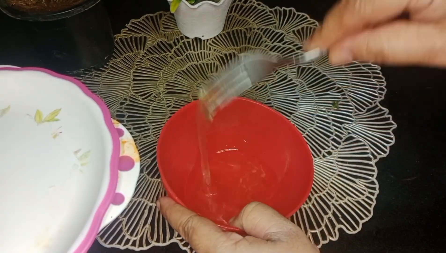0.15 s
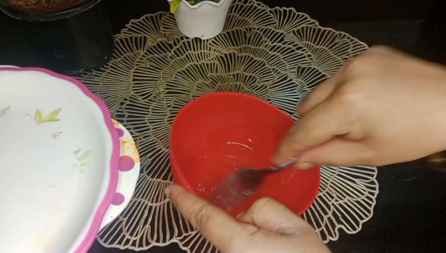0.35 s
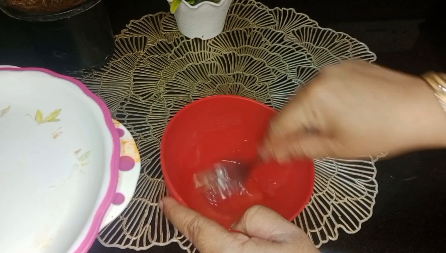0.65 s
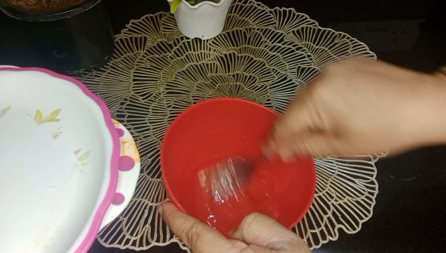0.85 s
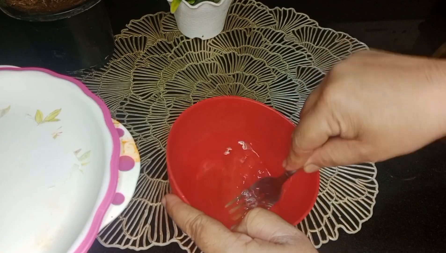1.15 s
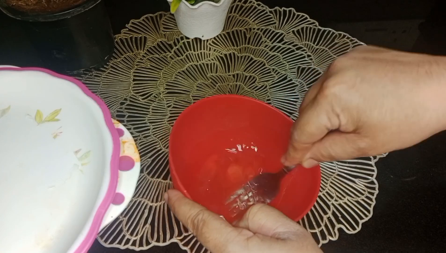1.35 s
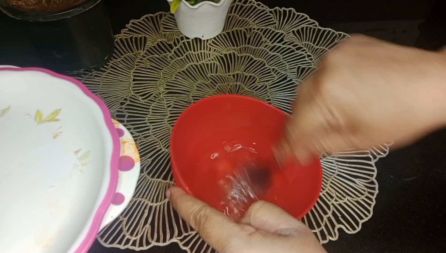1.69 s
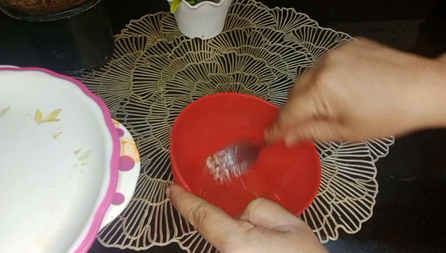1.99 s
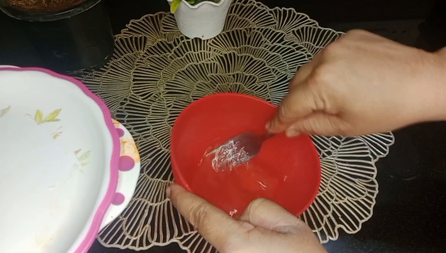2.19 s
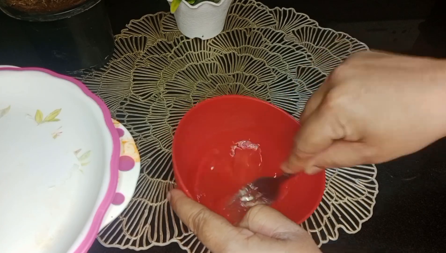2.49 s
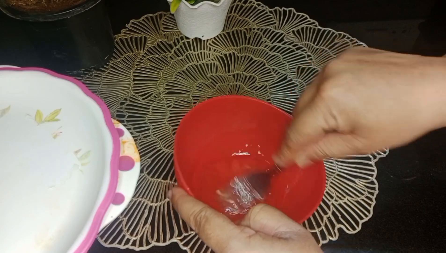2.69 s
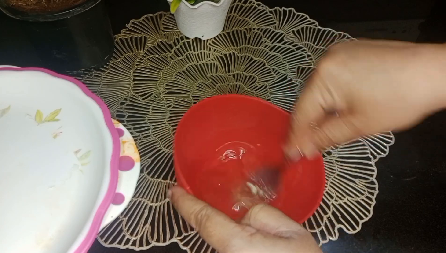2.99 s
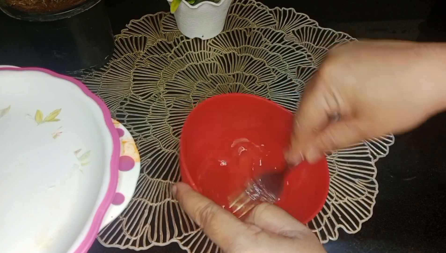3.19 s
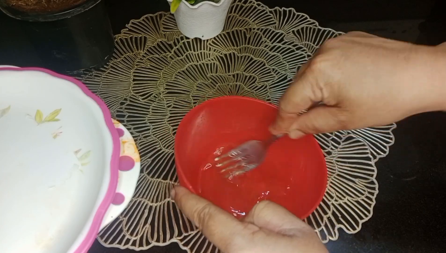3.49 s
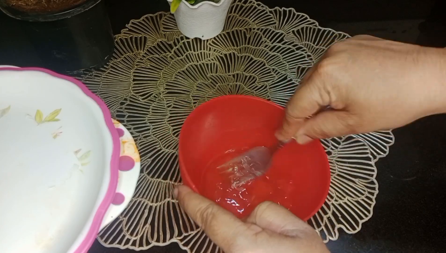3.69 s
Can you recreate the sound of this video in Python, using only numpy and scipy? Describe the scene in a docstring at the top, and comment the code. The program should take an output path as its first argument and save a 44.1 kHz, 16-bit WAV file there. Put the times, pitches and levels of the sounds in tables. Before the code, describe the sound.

A metal fork beats egg whites in a small plastic bowl. Only faint air and hand rumble until 0.5 s, then quick irregular clacks, dry and hollow, mix with short scratchy scrapes, bubbling, fizz and tiny wet snaps. From about 1.9 s the strokes grow denser and stronger; low table bumps come occasionally, the clearest at 2.0 s. Beating thins slightly after 3.4 s. Close, nearly mono, small kitchen.

```python
"""In a kitchen, a steel fork beats egg whites quickly in a small hand-held plastic bowl.
Tines clack and chatter: bursts of force through resonances of the base, wall and upper bowl.
Scrapes are stick-slip grains, the egg is chirping bubbles, fizz, sinking gulps and noise snaps,
and low thuds are the bowl bumping the table. Faint handling, air and a small room surround it;
the sound is close and nearly mono."""
import sys
import numpy as np
from scipy import signal
from scipy.fft import rfft, irfft, next_fast_len
from scipy.io import wavfile
from scipy.ndimage import uniform_filter1d, map_coordinates

SR = 44100
rng = np.random.default_rng(int(sys.argv[2]) if len(sys.argv) > 2 else 0)


def pcm_store(signal):
    """Save signal as 16-bit PCM."""
    levels = np.round(np.clip(np.atleast_2d(signal), -1, 1) * 32767)
    wavfile.write(sys.argv[1], SR, levels.astype(np.int16).T)


N = 169785  # length in samples


def amp(db):
    """Decibels to gain."""
    return 10 ** (np.asarray(db) / 20)


def unit(x):
    """Scale to rms 1."""
    return x / np.sqrt(np.mean(x ** 2) + 1e-20)


def along(points, hz):
    """Read (frequency, value) points on a log frequency axis."""
    f, v = np.transpose(points)
    return np.interp(np.log(hz + 1), np.log(f + 1), v)


def filtered(x, response):
    """Multiply the spectrum of x by a response of frequency."""
    n = x.shape[-1]
    m = next_fast_len(2 * n)
    return irfft(rfft(x, m) * response(np.fft.rfftfreq(m, 1 / SR)), m)[..., :n]


def coloured(x, spectrum):
    """Shape x with (frequency_hz, level_db) points, at rms 1."""
    return unit(filtered(x, lambda f: amp(along(spectrum, f))))


def resonate(x, modes, order=1):
    """Ring x through parallel (pitch_hz, width_hz, level_db) modes; a higher order steepens the skirts."""
    def response(f):
        total = 0
        for pitch, width, db in modes:
            band = 1j * f * width / (pitch * pitch - f * f + 1j * f * width)
            total = total + amp(db) * band ** order
        return total
    return filtered(x, response)


def burst(x):
    """Scale a short sound to the energy of 10 ms at rms 1."""
    return x * np.sqrt(SR / 100 / np.sum(x ** 2))


def add(track, s, x):
    """Mix x into track at time s in seconds."""
    part = track[max(round(s * SR), 0):][:len(x)]
    part += x[:len(part)]


def wobble(rate):
    """A smooth random curve with the given number of knots a second."""
    return map_coordinates(rng.standard_normal(int(N * rate / SR) + 4), [np.arange(N) * rate / SR])


def grains(rate, spread_db):
    """Random tiny impulses of either sign and uneven size, rate a second."""
    hits = rng.random(N) < rate / SR
    sizes = amp(spread_db * np.clip(rng.standard_normal(N), -2, 2))
    return hits * rng.choice([-1, 1], N) * sizes


# spectrum of the still air, before it is set to its rms: frequency_hz [Hz], level_db [dB]
AIR_SPECTRUM = [(20, -18.5), (110, 4), (700, -5), (2000, -20), (16000, -38.5)]
AIR_DB = -70


def air():
    """Steady noise, weighted to the lows."""
    return amp(AIR_DB) * coloured(rng.standard_normal(N), AIR_SPECTRUM)


def handling():
    """The bowl rumbles faintly in the hand: low noise of drifting level, from 0.38 s on."""
    held = np.arange(N) / SR > .38
    level = amp(-70.5 + 1.8 * wobble(14)) * held
    return level * unit(resonate(rng.standard_normal(N), [(111, 165, 0)], order=2))


# fader moves for the hollow base, before SWIRL_TRIM_DB: time_s [s], level_db [dB]
SWIRL_LEVELS = [(.49, -60), (.55, -47.5), (.70, -38.5), (.82, -67), (1.38, -66), (1.76, -51), (1.87, -29.5),
                (2.10, -32.5), (2.22, -46), (2.47, -37.5), (2.62, -54), (2.8, -59)]
SWIRL_TRIM_DB = -7.5


def swirl():
    """The swirled egg and dragging fork keep the base murmuring: grains through one broad resonance."""
    level_db = np.interp(np.arange(N) / SR, *np.transpose(SWIRL_LEVELS), left=-120)
    murmur = unit(resonate(grains(700, spread_db=3.5), [(1122, 355, 0)], order=3))
    return amp(level_db + SWIRL_TRIM_DB) * murmur


# tines meet the bowl; levels are before CONTACT_TRIM_DB and chatter is held to 1 ms or more:
# start_s [s], chatter_ms [ms], wall_pitch_hz [Hz], base_level_db [dB], wall_level_db [dB], upper_level_db [dB]
CONTACTS = [(0.491, 6, 1970, -77, -24.5, -37.0), (0.5348, 6.9, 1860, -71, -29.0, -51),
            (0.5424, 1.8, 1900, -42.5, -31, -32), (0.6642, 8.1, 2060, -38.5, -29.5, -33.5),
            (0.6747, 3.7, 1900, -32.5, -48, -29), (0.7614, 4.7, 2040, -46, -29, -34.5),
            (0.7866, 4.7, 2070, -55, -27, -35.5), (0.826, 16, 2210, -68, -23, -40),
            (0.8537, 3.1, 2260, -46, -21.5, -25), (0.8751, 4.1, 1760, -38.5, -35, -29.5),
            (0.987, 2.9, 1780, -57, -32.0, -35.5), (1.023, 4.5, 2060, -65, -32.5, -44),
            (1.0475, 2.9, 2290, -46, -30.5, -31.5), (1.0731, 6.8, 1960, -42.5, -36.5, -39.5),
            (1.1343, 4.1, 2130, -69, -34, -32.5), (1.158, 0.87, 2260, -50.5, -35.0, -27.0),
            (1.201, 7.8, 1970, -51, -22.5, -35), (1.2282, 2, 2165, -40.5, -19, -20.5),
            (1.251, 4.1, 1980, -38.0, -36, -34.5), (1.3126, 2.5, 2220, -67, -29.5, -38),
            (1.3533, 2.1, 2040, -68, -36, -32.5), (1.3949, 12.2, 1940, -34.5, -23, -41),
            (1.427, 3.7, 2170, -34.5, -30, -28.5), (1.4939, 4.2, 2110, -57, -35.5, -31),
            (1.5091, 15, 2170, -47, -42, -33), (1.5289, 2.7, 1970, -63, -20, -25),
            (1.5852, 4.6, 1910, -39, -22, -33.5), (1.598, 22, 2160, -35, -25, -50),
            (1.6154, 3.5, 1876, -29, -24.5, -27), (1.7873, 7.5, 2110, -32, -24, -25),
            (1.808, 2.1, 2050, -19, -29.0, -33.5), (1.9212, 2.7, 2030, -33.5, -24.5, -28.5),
            (1.9637, 2.7, 1990, -45, -21, -44), (1.99, 1.1, 2030, -35, -24.5, -23),
            (2.009, 3.2, 1880, -18.0, -39, -30.0), (2.0643, 5.7, 2030, -33.5, -30.5, -38),
            (2.1127, 2.2, 2000, -42, -28, -40), (2.1495, 4.3, 1760, -31, -20, -23.5),
            (2.1618, 5.6, 2220, -51, -19, -29.5), (2.1745, 7.5, 1660, -48, -24, -27.0),
            (2.2917, 1.9, 2020, -66, -29.5, -34), (2.3342, 3.6, 1900, -32, -19, -30),
            (2.3463, 7.3, 2186, -42, -17, -36), (2.3596, 5, 1950, -36, -24, -24.5),
            (2.3797, 1.5, 2010.0, -27.5, -50, -41), (2.4459, 7.7, 2230, -29.5, -24, -28.5),
            (2.4538, 4.2, 2090, -48, -24.5, -45), (2.527, 4.4, 2080, -33.5, -20.5, -26.5),
            (2.5407, 6.6, 1630, -53, -22.5, -26.0), (2.5548, 7.9, 1930, -34, -27.5, -22.0),
            (2.577, 2.3, 2060, -26.5, -35, -33.5), (2.6593, 4.3, 1780, -35.5, -23.5, -23),
            (2.7156, 5.8, 1920, -52, -26.5, -57), (2.726, 7.4, 2000, -48, -32, -40),
            (2.7426, 3.8, 2060, -37, -22, -21.5), (2.8771, 2.2, 1970, -56, -30.0, -34.5),
            (2.9065, 1.3, 2150, -43, -33, -23), (2.9358, 4.8, 2090, -43.5, -36.5, -38.5),
            (3.0083, 5.3, 2120, -34.0, -29.5, -43), (3.083, 2.9, 2140, -57, -19, -25.5),
            (3.105, 3.7, 2030, -43.5, -24.5, -45), (3.109, 2.3, 2060, -45, -46, -31.5),
            (3.167, 2.8, 2180, -47, -28.5, -35.0), (3.2726, 1, 2190, -47.0, -30.0, -23.5),
            (3.2981, 5.5, 1920, -34.0, -34, -28), (3.3792, 2.25, 1600, -33.5, -25.5, -23),
            (3.4706, 2.3, 2220, -57, -26, -32), (3.4949, 5.3, 2020, -48.5, -30, -43),
            (3.5881, 2.2, 1556, -38.5, -23.5, -25.5), (3.649, 5.6, 2080.0, -45.5, -37, -60),
            (3.6789, 4.5, 2170, -60, -17.5, -28.0), (3.7066, 4.6, 1930, -38, -33.0, -33.5),
            (3.7443, 2.9, 2004, -47.5, -25.5, -35.5)]
# base of the bowl, pitches before the sag: pitch_hz [Hz], width_hz [Hz, one filter pass], level_db [dB]
BASE_MODES = [(896.4, 90, -6), (1150, 386, 0)]
# upper resonances, before random scatter: pitch_hz [Hz], width_hz [Hz, one filter pass], level_db [dB]
UPPER_MODES = [(3040, 140, -2.5), (3476, 270, 3.5), (4214, 150, -7.5), (5376, 510, -11), (7440, 230, -80)]
WALL_WIDTH_HZ = 316  # one filter pass
CONTACT_TRIM_DB, CRACK_DB, MODE_SCATTER_DB = -1.5, -17.5, 3.5
CHATTER = 0.52  # noise gain beside the push
BASE_SAG_PER_DB = 0.02  # share of pitch lost per dB of harder push


def contacts():
    """A push and short chatter of the tines ring the damped plastic; a harder push sounds the base lower."""
    out, t = np.zeros(N), np.arange(2048) / SR
    usual_db = np.mean([row[3] for row in CONTACTS])
    for s, ms, wall_hz, base_db, wall_db, upper_db in CONTACTS:
        u = t / (max(ms, 1) / 1000)
        grip = np.exp(-u ** 1.07)
        sag = 1 - BASE_SAG_PER_DB * (base_db - usual_db - 11)
        base = [(hz * sag, width, db) for hz, width, db in BASE_MODES]
        wall = [(wall_hz, WALL_WIDTH_HZ, 0)]
        upper = []
        for hz, width, db in UPPER_MODES:
            pitch = hz * np.exp(0.027 * rng.standard_normal())
            upper.append((pitch, width, db + MODE_SCATTER_DB * rng.uniform(-1.5, 1)))
        for modes, db in [(base, base_db), (wall, wall_db), (upper, upper_db)]:
            force = CHATTER * grip * rng.standard_normal(len(t))
            force[:6] += signal.windows.hann(8)[1:-1] / 2  # the push
            add(out, s, amp(db + CONTACT_TRIM_DB) * burst(resonate(force, modes, order=2)))
        # a broad crack follows the louder of wall and upper
        crack = resonate(grip * rng.standard_normal(len(t)), [(2450, 1140, 0)], order=3)
        add(out, s, amp(max(wall_db, upper_db) + CRACK_DB) * burst(crack))
    return out


GULP_DB = -14  # beside the base level of the contact
GULP_START_HZ, GULP_END_HZ, GULP_S = 1089.7, 759.5, 0.0301


def gulps():
    """Behind a push on the base a pocket opens in the egg, and its fuzzy note sinks."""
    out, t = np.zeros(N), np.arange(SR // 8) / SR
    hz = GULP_END_HZ + (GULP_START_HZ - GULP_END_HZ) * np.exp(-t / GULP_S)
    swell = t * np.exp(-2 * t / GULP_S)
    for s, _, _, base_db, *_ in CONTACTS:
        fuzz = np.cumsum(0.035 * rng.standard_normal(len(t)))
        phase = 2 * np.pi * np.cumsum(hz) / SR + fuzz
        add(out, s, amp(base_db + GULP_DB) * burst(swell * np.sin(phase)))
    return out


BUBBLE_HZ = 2493  # centre of the random starting pitches
BUBBLE_CYCLES = 8.2  # cycles to fade to 1/e
BUBBLES_PER_S = 190


def bubbles():
    """Small bubbles, pitched within an octave either way, each a few rising cycles; rms 1."""
    out, t = np.zeros(N), np.arange(1024) / SR
    for when, pitch, strength in rng.random((int(BUBBLES_PER_S * N / SR), 3)):
        cycles = t * BUBBLE_HZ * 2 ** (2 * pitch - 1)
        age = cycles / BUBBLE_CYCLES
        envelope = np.exp(-age) * (1 - np.exp(-cycles))
        pop = np.sin(2 * np.pi * cycles * (1 + 0.0335 * age)) * envelope
        add(out, when * N / SR, amp(20 * strength) * pop)
    return unit(out)


# tines drag through the egg along the wall, before SCRAPE_TRIM_DB: start_s [s], end_s [s], level_db [dB]
SCRAPES = [(0.519, 0.569, -42.5), (0.63, 0.682, -43), (0.737, 0.778, -41), (0.851, 0.864, -35),
           (1.019, 1.052, -44), (1.117, 1.157, -46), (1.202, 1.26, -36), (1.296, 1.362, -41),
           (1.485, 1.537, -38.5), (1.59, 1.63, -38), (1.873, 1.931, -36.5), (1.958, 2.025, -33.5),
           (2.045, 2.125, -37.5), (2.242, 2.296, -36.5), (2.337, 2.388, -36.5), (2.429, 2.492, -38.5),
           (2.53, 2.675, -40), (2.705, 2.76, -39.5), (2.857, 2.928, -38), (3.082, 3.121, -36),
           (3.248, 3.391, -42), (3.471, 3.506, -36), (3.67, 3.731, -41.5)]
# bowl and tines under a scrape: pitch_hz [Hz], width_hz [Hz, one filter pass], level_db [dB]
RUB_MODES = [(1138, 470, -16.5), (1582, 470, -11.5), (2174, 336, -1), (3010, 580, -9), (3490, 490, -8),
             (4220, 470, -14), (5435, 800, -15)]
# spectrum of the fizz, before it is set to rms 1: frequency_hz [Hz], level_db [dB]
FIZZ_SPECTRUM = [(2000, 7), (5500, 21.5), (7800, 4), (9200, -18), (10300, -22), (12000, 7.5), (15500, 6)]
SCRAPE_TRIM_DB, SCRAPE_RISE_S, SCRAPE_FALL_S = 2.5, 0.014, 0.0036
GRAINS_PER_S = 1500
STIR_DB = -46.5  # centre of the drifting level
BUBBLE_DB, FIZZ_DB = -4.5, -22.5  # gains beside the effort


def scrapes():
    """Stick-slip grains under each drag and light stirring; the egg bubbles with the effort and fizzes."""
    t, drags = np.arange(N) / SR, np.zeros(N)
    for start, end, db in SCRAPES:
        rise = np.clip((t - start) / SCRAPE_RISE_S, 0, 1)
        fall = np.exp(-np.maximum(t - end, 0) / SCRAPE_FALL_S)
        drags = np.maximum(drags, amp(db + SCRAPE_TRIM_DB) * rise * fall)
    stir = amp(STIR_DB + 2.24 * wobble(17)) * (t > CONTACTS[0][0])
    effort = np.maximum(drags, stir)
    rub = np.zeros(N)
    for hz, width, db in RUB_MODES:
        slips = grains(GRAINS_PER_S, spread_db=1.5) * amp(2.3 * wobble(60))
        rub += amp(db) * unit(resonate(slips, [(hz, width, 0)], order=2))
    wet = unit(resonate(bubbles(), RUB_MODES))
    fizz = coloured(grains(5000, spread_db=3), FIZZ_SPECTRUM)
    # the fizz swells in the drags, smoothed over 700 samples
    swell = uniform_filter1d((drags + effort) / 2, size=700)
    return effort * (rub + amp(BUBBLE_DB) * wet) + swell * amp(FIZZ_DB) * fizz


# sharp wet snaps: start_s [s], level_db [dB]
SNAPS = [(.988, -46.5), (1.228, -49.5), (2.009, -53), (2.340, -52.5), (2.657, -49.5), (3.469, -47),
         (3.588, -54.5)]


def snaps():
    """Films of egg break with a bright, very short tick of noise."""
    out, t = np.zeros(N), np.arange(512) / SR
    for s, db in SNAPS:
        tick = rng.standard_normal(len(t)) * amp(-60 * t / 0.0072)  # down 60 dB in 7.2 ms
        add(out, s, amp(db) * burst(resonate(tick, [(5730, 2600, 0)])))
    return out


# the bowl bumps the table: start_s [s], level_db [dB]
BUMPS = [(1.239, -53.5), (1.477, -47), (1.529, -44), (1.809, -43.5), (2.007, -33), (2.381, -44),
         (2.559, -47.5), (3.297, -52), (3.381, -56.5)]
# low resonances each thud rings through: pitch_hz [Hz], width_hz [Hz, one filter pass], level_db [dB]
THUD_MODES = [(118, 42, -2), (178, 27, 2.5), (310, 140, -15.5)]


def bumps():
    """Low thuds of the table under the bowl: an impulse through low resonances."""
    out = np.zeros(N)
    thud = burst(resonate(signal.unit_impulse(SR // 3), THUD_MODES, order=2))
    for s, db in BUMPS:
        add(out, s, amp(db) * thud)
    return out


# narrow hollow ring of the bowl, levels before RING_DB: pitch_hz [Hz], width_hz [Hz], level_db [dB]
RING_MODES = [(834, 5.5, -18), (917, 10, -6), (975.5, 18, 3), (1046, 18, 1.5), (1150, 9.9, 3),
              (1249, 35, 1)]
# bands the bowl radiates poorly: pitch_hz [Hz], width_hz [Hz], cancelled_share_db [dB]
DIPS = [(1386, 92, -11.5), (2537, 290, -6.5), (4670, 240, -6.5)]
RING_DB = 0.5


def through_bowl(fork):
    """The bowl adds its hollow ring to the fork and cancels part of the bands it radiates poorly."""
    ring = amp(RING_DB) * resonate(fork, RING_MODES)
    return fork + ring - resonate(fork, DIPS)


# decay of the room: frequency_hz [Hz], t60_s [s]
ROOM_DECAY = [(150, 0.54), (2000, 0.21), (12000, 0.19)]
ROOM_DB = -14


def kitchen(x):
    """A small room's tail of noise, each frequency dying at its own speed."""
    hz, t, z = signal.stft(rng.standard_normal(SR // 2), SR, nperseg=256)
    decay = amp(-60 * t / along(ROOM_DECAY, hz)[:, None])
    tail = signal.istft(z * decay, SR, nperseg=256)[1]
    tail *= np.clip(np.arange(len(tail)) / SR / 0.002, 0, 1) ** 2  # 2 ms fade-in
    return amp(ROOM_DB) * signal.fftconvolve(x, tail / np.linalg.norm(tail))[:N]


# stereo spread: frequency_hz [Hz], side_over_mid_db [dB]
WIDTH = [(2500, -58.5), (7000, -16)]


def spread(mid):
    """A quarter-cycle-shifted copy, added left and subtracted right, widens mainly the treble."""
    side = filtered(mid, lambda f: 1j * amp(along(WIDTH, f)))
    return np.array([mid + side, mid - side])


def scene():
    """Fork and egg sound through the bowl, with snaps and bumps, in the middle of the kitchen."""
    fork = contacts() + scrapes() + swirl() + gulps()
    bowl = through_bowl(fork) + snaps() + bumps()
    return spread(bowl + kitchen(bowl) + handling() + air())


TOP_HZ = 16200


def record(dry):
    """A band limit: nothing is kept from TOP_HZ upward."""
    return filtered(dry, lambda hz: hz < TOP_HZ)


dry = scene()
out = record(dry)
pcm_store(out)
```